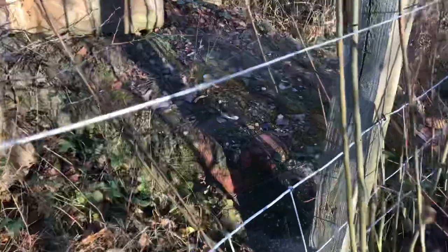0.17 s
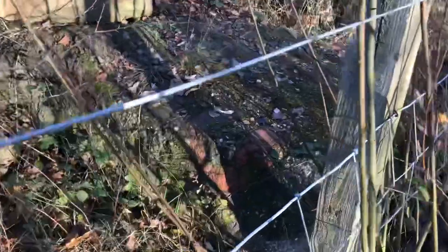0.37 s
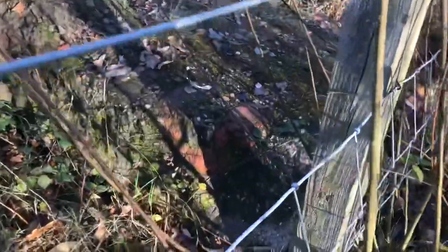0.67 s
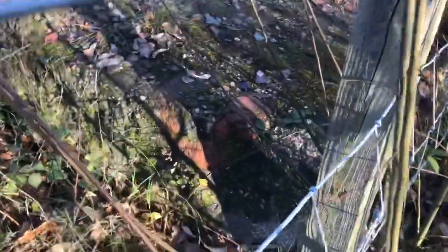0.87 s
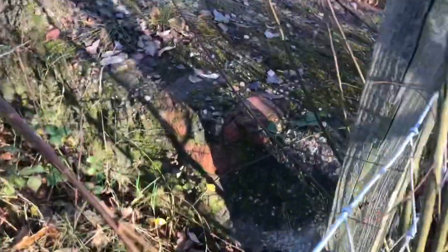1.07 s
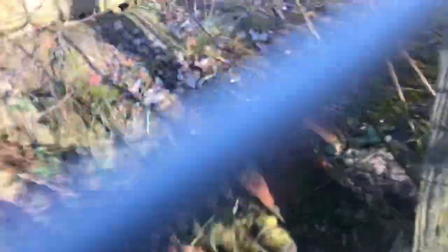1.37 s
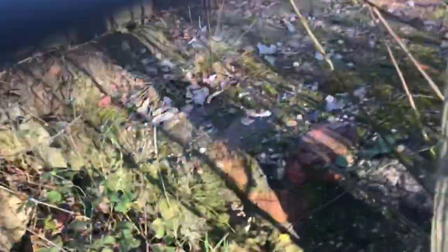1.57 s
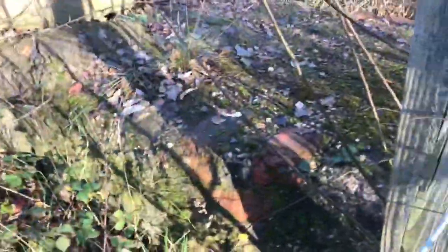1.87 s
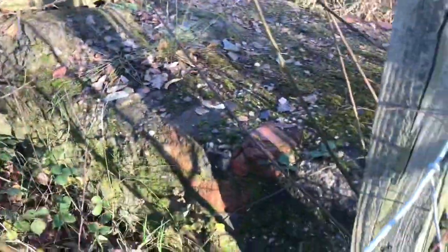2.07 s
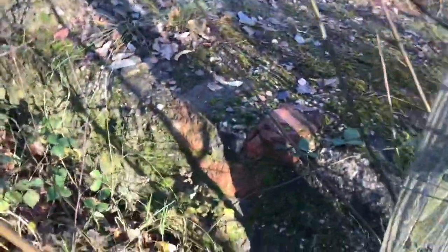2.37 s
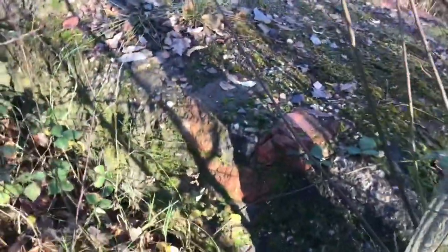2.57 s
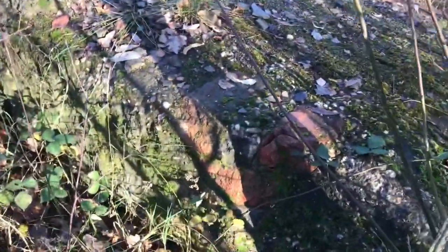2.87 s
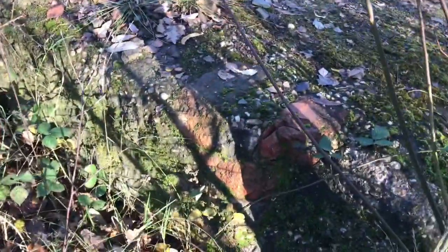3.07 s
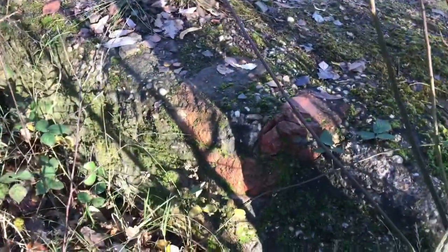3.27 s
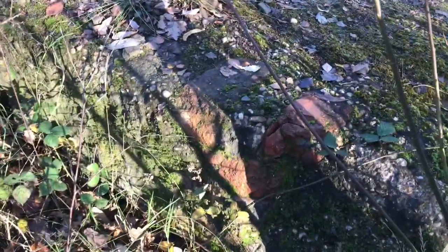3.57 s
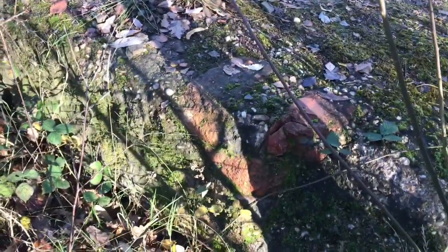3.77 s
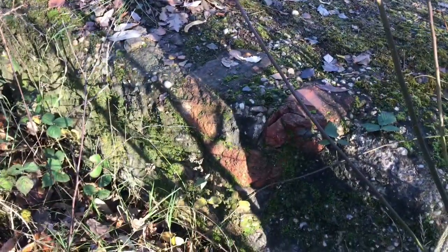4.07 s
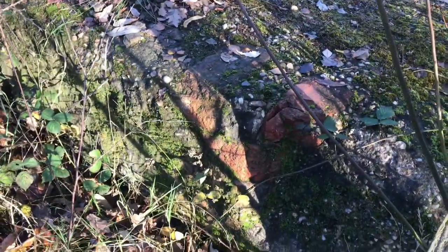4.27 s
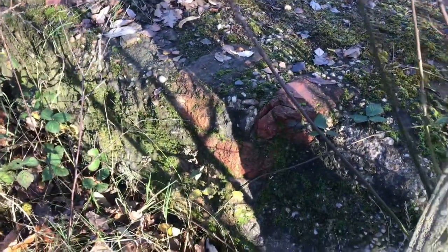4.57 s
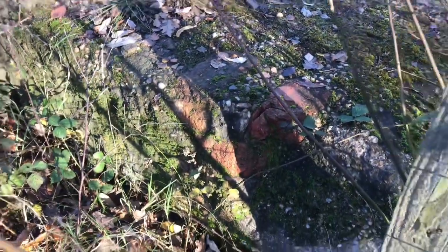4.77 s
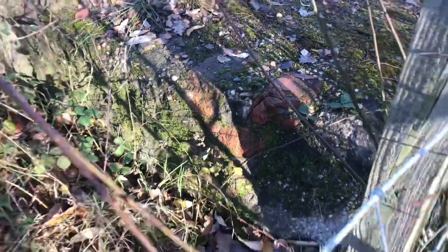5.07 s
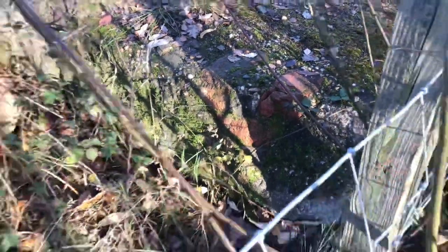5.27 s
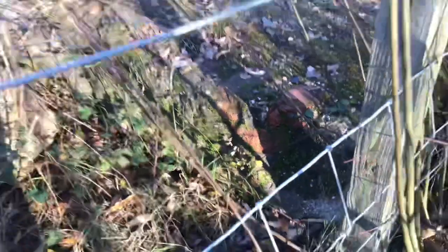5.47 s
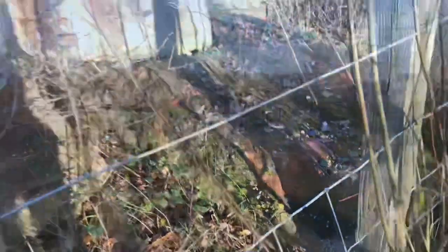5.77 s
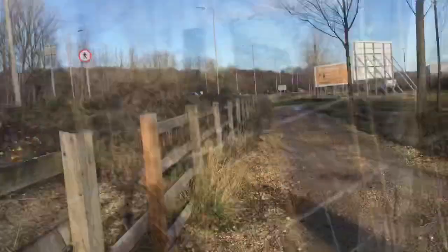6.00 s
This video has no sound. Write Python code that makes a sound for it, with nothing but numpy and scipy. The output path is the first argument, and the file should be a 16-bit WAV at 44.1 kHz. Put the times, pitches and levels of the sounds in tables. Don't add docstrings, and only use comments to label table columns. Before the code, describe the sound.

Sleeve rustle, twig ticks and one loud wire knock against the microphone, over faint steady traffic; a final tick, then nearer road roar.

```python
import sys
import numpy as np
from scipy import signal
from scipy.fft import rfft, irfft, next_fast_len
from scipy.io import wavfile
from scipy.ndimage import uniform_filter1d

SR = 44100
rng = np.random.default_rng(int(sys.argv[2]) if len(sys.argv) > 2 else 0)


def voltage_ratio(decibels):
    exponent = np.asarray(decibels, float) / 20
    return 10 ** exponent


def waveform_to_disk(signal):
    frames = np.transpose(np.atleast_2d(signal))
    scaled = np.clip(frames, -1, 1) * 32767
    samples = np.round(scaled).astype(np.int16)
    wavfile.write(sys.argv[1], SR, samples)


N = 270553
TIME = np.arange(N) / SR

# t/s, hiss level/dB, coarse over fine/dB
SLEEVE_MOTION = [(0, -75.5, 14), (.17, -68.5, 2), (1.1, -67.5, -1), (1.19, -62.5, 3), (1.46, -64.5, 7.5),
                 (1.58, -71, 11), (1.8, -71.5, -2), (2.44, -70.5, 2), (3.1, -75.5, 3), (3.5, -83, 8),
                 (4.4, -93, 12), (4.76, -70, 0), (4.92, -66.5, 1.5), (5.31, -71, 4), (5.42, -61.5, -1),
                 (5.66, -53.5, -8), (5.74, -60, 1), (5.84, -73, 2)]
# t/s, length/s, hiss level/dB, coarse over fine/dB
CLOTH_STROKES = [(0.091, 0.067, -73, 23), (0.173, .03, -60.5, -1.5), (0.213, 0.25, -56.5, -0.5),
                 (0.403, 0.29, -63.5, 1.5), (0.645, 0.16, -46, -2.5), (0.785, .012, -40, -1),
                 (0.797, 0.093, -52, 1), (0.87, .066, -47, -5), (0.93, 0.023, -45.5, -4.5),
                 (0.958, 0.095, -57, -3), (1.16, 0.046, -63, 1.5), (1.246, 0.028, -60, 3),
                 (1.29, 0.16, -61.5, 0), (1.497, 0.028, -72, .6), (1.61, .155, -67, 10.5),
                 (1.873, 0.022, -69, -6), (2.037, .09, -67, 5), (2.125, 0.1, -61, 0),
                 (2.2, 0.027, -56.5, -5), (2.275, .03, -68, 5), (2.865, .03, -72, 1),
                 (3.17, 0.028, -75, 1.5), (4.21, .025, -79, 3), (4.46, .04, -77, 1.5),
                 (4.811, 0.057, -58.5, -1), (5, 0.055, -69, 9), (5.1, .05, -69, -.5),
                 (5.466, .08, -63.5, 5), (5.568, 0.013, -52.5, 2.5), (5.651, 0.042, -50.5, -4)]
# level/dB in the fine, middle and coarse bands
REST_LEVELS = [-95, -97, -75]
RUB_CENTRES = [12000, 6700, 3400]
# f/Hz, level per Hz/dB
RUB_SPECTRUM = [(1800, 2), (2600, 1), (3800, -2), (4900, -4), (6500, -0.5), (7600, -4), (9500, -1.5),
                (15600, -3.5), (16000, -20)]
# t/s, peak level/dB, centre f/Hz
CLOTH_SLIPS = [(0.2145, -35, 9180), (0.4329, -35.5, 8660), (0.6295, -46, 13400), (0.652, -27, 14200),
               (0.6923, -23, 12500), (0.7924, -19, 8100), (0.8445, -32, 6190), (0.8759, -21, 14300),
               (0.9378, -20.5, 14900), (0.9524, -26, 14100), (1.0394, -37, 14200), (1.3573, -37, 6100),
               (1.6403, -35, 12100), (4.8, -43, 5440), (4.8429, -38, 12650), (5.0474, -42, 12900),
               (5.3408, -45, 8800), (5.3697, -39, 14800), (5.4116, -41, 9320), (5.4385, -48, 6570),
               (5.5368, -29, 12800), (5.5787, -35, 12900)]
# t/s, peak level/dB, centre f/Hz
CLOTH_CREASES = [(1.8801, -51, 5770), (2.1444, -47, 5600), (2.2094, -48, 5670), (2.2857, -56, 6180),
                 (2.4638, -53, 5430), (2.66, -58, 10000), (2.8759, -52, 13000), (3.27, -59, 11500),
                 (3.37, -58, 13500), (3.41, -60, 6000), (3.09, -56, 5000), (3.1926, -48.5, 6590),
                 (3.5274, -53, 5960), (3.6217, -53, 11700), (4.2294, -58, 6370), (4.36, -58, 6200),
                 (4.4686, -49, 7690), (4.5, -58, 8000)]
# t/s, peak level/dB, centre f/Hz
DRY_SNAPS = [(0.4824, -49, 4290), (0.5436, -32, 12500), (.5536, -32, 5150), (0.582, -36, 4020),
             (0.7294, -41, 6700), (0.7854, -22, 7860), (0.8814, -23, 5570), (1.2044, -42, 6020),
             (1.2665, -39, 6750), (1.9894, -51.5, 4450), (2.3044, -51, 4660), (2.463, -48, 5430),
             (2.5094, -54, 4120), (4.9194, -54, 9000), (5.0474, -37, 12900), (5.1093, -38, 6430),
             (5.1672, -41, 13100), (5.2255, -48, 4130), (5.2694, -48, 12200)]
# t/s, peak level/dB, centre f/Hz
THORN_RASPS = [(0.0964, -42, 3020), (0.1074, -33, 2820), (0.12, -36, 2900), (0.133, -48, 2720),
               (0.1424, -30.5, 2630), (0.1537, -30, 2400), (0.2913, -42, 3310), (0.333, -38, 3220),
               (0.4534, -43, 2660), (1.3169, -41, 2300), (1.6724, -45, 3700), (1.7065, -35, 3000),
               (1.7379, -39, 2440), (1.76, -44, 3600), (5.0114, -47, 2710), (5.047, -45, 2690)]
# t/s, peak level/dB, centre f/Hz, fade/s
THORN_SQUEAKS = [
    (.147, -29.5, 2530, 0.053),
    (.157, -36, 2470, 0.03),
    (2.14, -52, 5660, .12),
    (2.205, -54, 5650, .1),
    (4.99, -48, 2700, .2),
    (5.02, -46.5, 2750, 0.19),
]
# t/s, peak level/dB, centre f/Hz, fade/s
WIRE_SLIDES = [
    (1.158, -29, 3020, 0.042),
    (1.19, -58, 6600, .3),
    (1.3, -53, 6800, 0.65),
    (1.39, -54, 7100, 0.54),
    (1.26, -55, 3100, .6),
    (1.45, -58, 3300, .6),
    (1.6, -57, 3200, .6),
]
# t/s, peak level/dB, pitch f/Hz, snap level/dB, hollow level/dB
TWIG_TICKS = [(0.1228, -26, 2630, -20, -30), (0.216, -36, 6000, 9, -30), (0.3424, -17, 3720, -7, -2.5),
              (.3425, -21, 1980, -25, -25), (.398, -31.5, 6800, -12, -30), (0.399, -36, 4200, -25, -30),
              (0.436, -32, 3500, -14, 6), (0.713, -26.5, 2540, -20, 4.5), (.8194, -35, 2520, -20, -10),
              (1.257, -43, 4600, -20, -30), (1.4306, -38, 2790, -12, -30), (3.0898, -50, 4580, -20, -30),
              (5.483, -31, 2880, -10, -22), (5.688, -11, 2920, -25, -15), (5.694, -29, 3200, -25, -10)]
# t/s, peak level/dB, pitch f/Hz, ring/s
HAND_BUMPS = [(0.341, -36, 228, 0.072), (0.432, -37.5, 314, 0.049), (0.713, -39, 520, 0.064),
              (0.777, -28, 200, 0.03), (0.819, -23.5, 500, 0.022), (0.873, -28.5, 226, 0.04),
              (0.968, -29.5, 186, 0.048), (1.259, -28, 165, 0.12), (1.36, -25, 170, 0.042),
              (1.39, -45, 280, 0.045), (1.44, -25.5, 182, 0.026)]
# t/s, crack level/dB, body level/dB, edge level/dB
WIRE_KNOCK = [
    (1.1564, 2, -2.5, -21),
    (1.167, -21, -17, -29),
    (1.1778, -48, -23.5, -32),
]
# f/Hz, level/dB, t60/s
CASE_MODES = [(86, -15, 0.077), (133, -14.5, 0.23), (261, 2.5, 0.028), (393, -3, 0.031), (535, -3.5, 0.018),
              (1050, 11.5, 0.006)]
# f/Hz, level/dB, t60/s
CRACK_MODES = [(3220, 4.5, 0.0017), (1880, 2.5, 0.0014)]
# f/Hz, level/dB, t60/s
EDGE_MODES = [(6100, -4, 0.0032), (9600, 2.5, 0.00093), (13500, -5, 0.0014)]
# t/s, level/dB
WIRE_SHAKE = [
    (1.16, -56),
    (1.19, -28.5),
    (1.25, -40),
    (1.4, -35),
    (1.46, -54),
    (1.55, -52),
]
# f/Hz, width/Hz, level/dB
SHAKEN_MODES = [(130, 31, 1), (250, 78, -2), (391, 29, -2.5)]
# f/Hz, level per Hz/dB
NEAR_SPECTRUM = [(25, -34), (60, -8), (110, 1.5), (190, -1.5), (300, -12), (550, -10), (990, -6.5),
                 (1600, -14), (2400, -24.5), (4500, -39), (9000, -52.5), (16000, -65)]
# f/Hz, level per Hz/dB
FAR_SPECTRUM = [(25, -27.5), (62, 1), (150, -14), (280, -17), (450, -25), (680, -19.5), (960, -11),
                (1300, -15.5), (1700, -20), (2200, -29.5), (3200, -41.5), (4700, -56.5), (7000, -60.5),
                (16000, -61)]
# t/s, tyre level/dB, brightening above 1 kHz/(dB per octave)
TRAFFIC_FLOW = [(0, -42.5, 0.5), (1.2, -42.5, -1), (2.45, -42, 0.8), (2.7, -43, 0.8), (3.6, -44, 0.15),
                (4.3, -43.5, 1.5), (4.6, -42, 1.5), (5.05, -43, 0), (5.6, -43, 1)]
# t/s, extra level/dB, half length/s
LORRY_PASSES = [(1.34, 3, 0.19), (2.247, 0.5, 0.36), (3.55, 1, .1), (4.287, 3, 0.096), (4.65, 2, 0.072),
                (5.195, 4.5, 0.22)]


def curve(rows):
    s, *columns = np.transpose(rows)
    return [np.interp(TIME, s, c) for c in columns]


def unit(x):
    return x / np.sqrt(np.mean(x ** 2))


def walk(rate):
    k = int(SR / rate)
    steps = np.repeat(rng.standard_normal(N // k + 1), k)
    return 1.54 * uniform_filter1d(uniform_filter1d(steps, k), k)[:N]


def bands(x, colour, gain, count=1):
    size = next_fast_len(N)
    octave = np.log2(np.maximum(np.arange(size // 2 + 1) * SR / size, 1))
    hz, db = np.transpose(colour)
    spectrum = rfft(x, size) * voltage_ratio(np.interp(octave, np.log2(hz), db, left=-90, right=-90))
    spectrum = spectrum * np.sqrt(size) / np.sqrt(2 * np.sum(np.abs(spectrum) ** 2) / size)
    out = np.zeros(N)
    for c in np.arange(np.floor(np.log2(hz[0])), 14.6, 1 / count):
        triangle = np.clip(1 - count * np.abs(octave - c), 0, 1)
        out += gain(2. ** c) * irfft(spectrum * triangle, size)[:N]
    return out


def add(out, s, sound):
    i = int(s * SR)
    out[i:i + len(sound)] += sound[:N - i]


def ring(hz, t60, rise=.0001):
    t = np.arange(int(SR * t60 * 1.2) + 8) / SR
    return np.sin(2 * np.pi * hz * t) * np.exp(-np.log(1000) * t / t60) * (1 - np.exp(-t / rise))


def puffs(events, spread, rise, trim_db):
    out = np.zeros(N)
    t = np.arange(8192) / SR
    for s, db, hz, fade in events:
        b, a = signal.butter(2, [hz / spread, min(hz * spread, .45 * SR)], "bandpass", fs=SR)
        noise = signal.lfilter(b, a, rng.standard_normal(len(t)))
        shape = (1 - np.exp(-t / rise)) * np.exp(-np.log(1000) * t / fade) * (1 - t / t[-1])
        add(out, s, voltage_ratio(db + trim_db) * unit(noise) * shape)
    return out


def fading(events, fade):
    return [(*event, fade) for event in events]


def rubbing():
    levels = effort()
    grains = rng.standard_normal(N) * voltage_ratio(1.6 * rng.exponential(size=N))
    flurry = 1.1 * walk(60) + .5 * walk(200)

    def gain(hz):
        share = np.array([np.interp(-hz, -np.array(RUB_CENTRES), row) for row in np.eye(3)])
        patchy = 1.2 * walk(25) + 2.15 * walk(250)
        return voltage_ratio(share @ levels + 4.0 + patchy)

    return voltage_ratio(flurry) * bands(grains, RUB_SPECTRUM, gain, count=3)


def effort():
    attack_s, release_s, sag_db_per_s = .008, .015, 9
    lean = np.array([[0], [0.11], [1]])
    motion_db, press_db = curve(SLEEVE_MOTION)
    power = voltage_ratio(np.array(REST_LEVELS))[:, None] ** 2 + voltage_ratio(motion_db + press_db * lean) ** 2
    for s, length, db, tilt_db in CLOTH_STROKES:
        i = slice(int(s * SR), int((s + length + release_s) * SR))
        t = TIME[i] - s
        shape = np.clip(t / attack_s, 0, 1) * np.clip(1 - (t - length) / release_s, 0, 1)
        power[:, i] += (shape * voltage_ratio(db + tilt_db * lean - sag_db_per_s * t)) ** 2
    weave_trim_db = np.array([[0], [-1.35], [0]])
    return 10 * np.log10(power) + weave_trim_db


def slips():
    cloth = fading(CLOTH_SLIPS, 0.022) + fading(CLOTH_CREASES, 0.029)
    out = puffs(cloth, 1.6, 0.00037, -7.5)
    out += puffs(fading(DRY_SNAPS, .008), 1.6, 0.0004, -3.0)
    out += puffs(fading(THORN_RASPS, 0.025), 1.22, 0.0011, -3.5)
    out += puffs(WIRE_SLIDES, 1.1, .012, -0.5)
    out += puffs(THORN_SQUEAKS, 1.025, 0.0025, -6.0)
    return out


def taps():
    out = np.zeros(N)
    t60 = 0.002
    for s, db, hz, snap_db, hollow_db in TWIG_TICKS:
        add(out, s, voltage_ratio(db + 3.5) * (ring(hz, t60, 0.00011) + 0.35 * ring(hz * 1.87, t60, 0.00026)))
        add(out, s, voltage_ratio(db + snap_db) * ring(14000, .0012, .00003))
        add(out, s, voltage_ratio(db + hollow_db) * ring(910, 0.0095, 0.00034))
    for s, db, hz, t60 in HAND_BUMPS:
        add(out, s, voltage_ratio(db + 1.5) * (ring(hz, t60, 0.0019) + .5 * ring(hz * 1.605, t60, 0.0014)))
    return out


def knock():
    out = np.zeros(N)
    for s, crack_db, body_db, edge_db in WIRE_KNOCK:
        for k, (hz, db, t60) in enumerate(CRACK_MODES):
            add(out, s, (-1) ** k * voltage_ratio(crack_db + db) * ring(hz, t60, 0.00027))
        for hz, db, t60 in EDGE_MODES:
            add(out, s, voltage_ratio(edge_db + db + 6.5) * ring(hz, t60))
        for k, (hz, db, t60) in enumerate(CASE_MODES):
            add(out, s, -(-1) ** k * voltage_ratio(body_db + db) * ring(hz, t60, 0.0023))
    return out


def shaking():
    jolts = rng.standard_normal(N) * voltage_ratio(2.0 * walk(49.64))
    rung = np.zeros(N)
    for hz, width, db in SHAKEN_MODES:
        b, a = signal.iirpeak(hz, hz / width, fs=SR)
        rung += voltage_ratio(db) * signal.lfilter(b, a, jolts)
    rung = signal.sosfilt(signal.butter(2, [90, 480], "bandpass", fs=SR, output="sos"), rung)
    touching = (TIME > WIRE_SHAKE[0][0]) * (TIME < WIRE_SHAKE[-1][0])
    return touching * voltage_ratio(curve(WIRE_SHAKE)[0]) * unit(rung)


def near_road():
    dissolve_s, length_s, level_db = 5.562, 0.53, -26
    fade_in = np.clip((TIME - dissolve_s) / length_s, 0, 1)

    def rough(hz):
        return voltage_ratio(.8 * walk(25))

    return voltage_ratio(level_db) * fade_in * bands(rng.standard_normal(N), NEAR_SPECTRUM, rough)


def far_road():
    tyre_db, bright_db = curve(TRAFFIC_FLOW)
    engine_db = np.full(N, -47.0)
    for s, db, half in LORRY_PASSES:
        engine_db += db * np.exp(-((TIME - s) / half) ** 2)

    def gain(hz):
        if hz < 200:
            return voltage_ratio(engine_db + 8.0 + 1.14 * walk(7.3))
        octaves = np.clip(np.log2(hz / 1000), -1, 2)
        return voltage_ratio(tyre_db + bright_db * octaves + 4.0 + 0.47 * walk(7))

    return bands(rng.standard_normal(N), FAR_SPECTRUM, gain)


def scene():
    handling = rubbing() + slips() + taps() + knock() + shaking()
    road = near_road() + far_road()
    return (handling + road)[None]


def band_limit(x):
    return signal.sosfilt(signal.butter(12, 16510, fs=SR, output="sos"), x)


def record(dry):
    port = signal.lfilter(*signal.iirpeak(10500, 9.0, fs=SR), dry)
    top_cut = signal.ellip(10, .2, 35, 15800, fs=SR, output="sos")
    mix = signal.sosfilt(top_cut, dry - .45 * port)
    return band_limit(mix)


dry = scene()
out = record(dry)
waveform_to_disk(out)
```